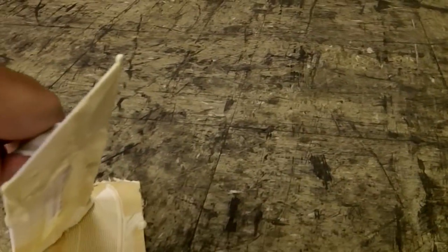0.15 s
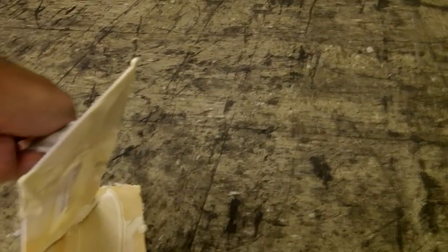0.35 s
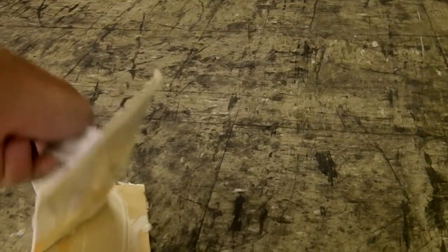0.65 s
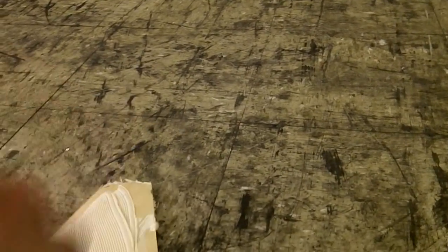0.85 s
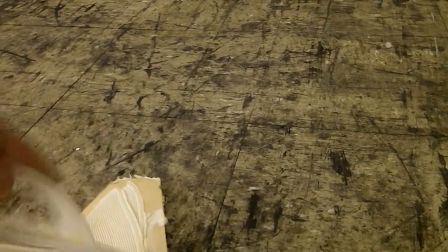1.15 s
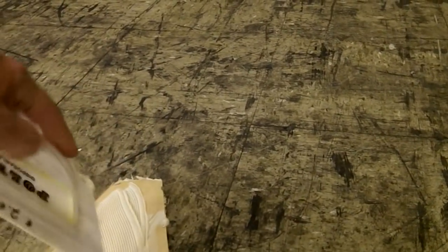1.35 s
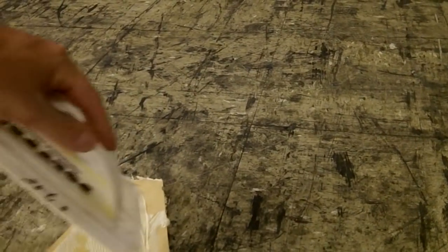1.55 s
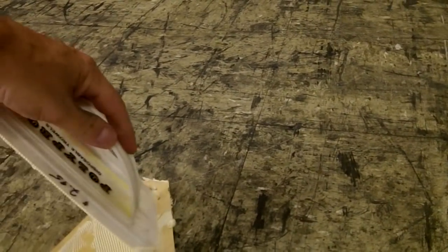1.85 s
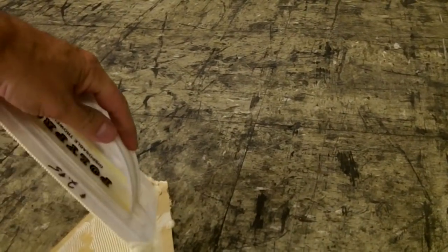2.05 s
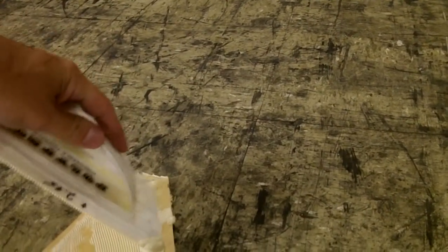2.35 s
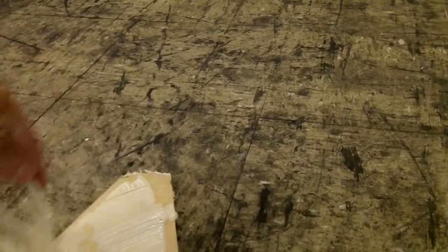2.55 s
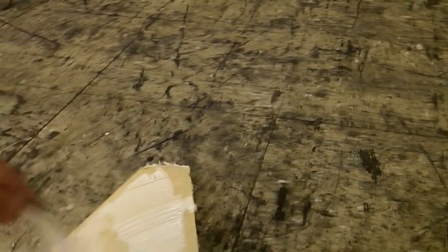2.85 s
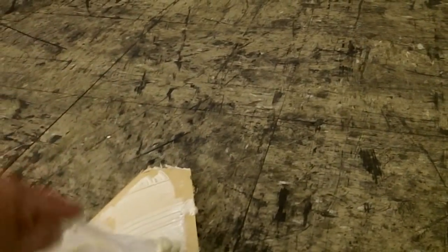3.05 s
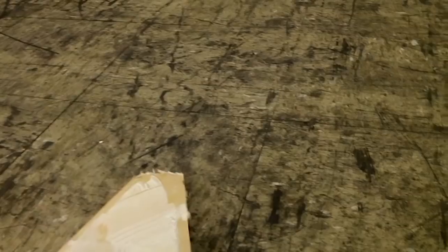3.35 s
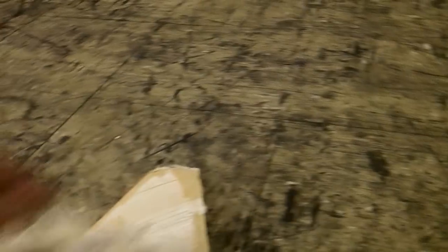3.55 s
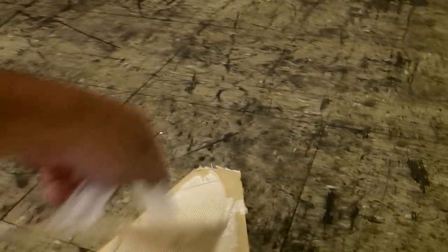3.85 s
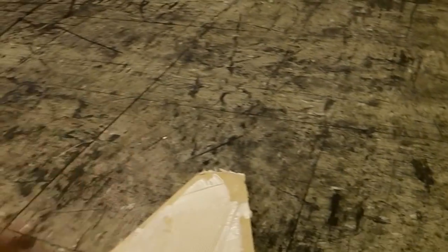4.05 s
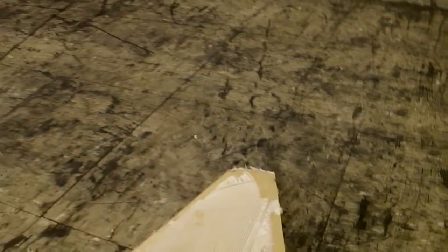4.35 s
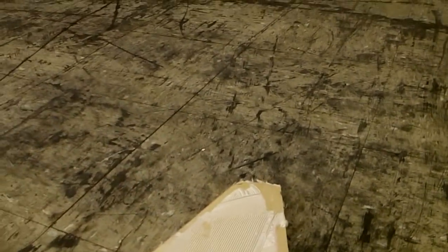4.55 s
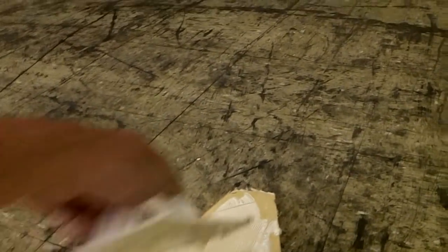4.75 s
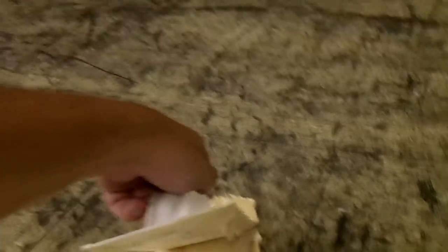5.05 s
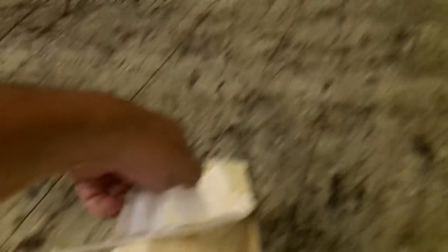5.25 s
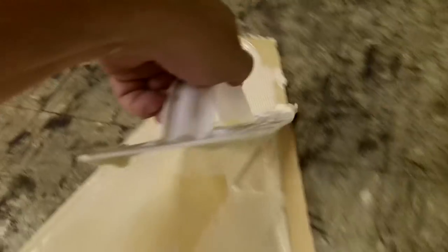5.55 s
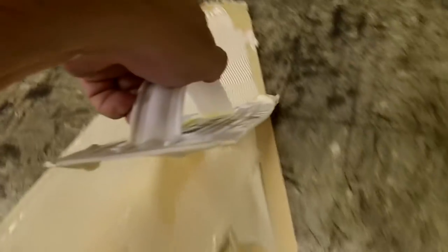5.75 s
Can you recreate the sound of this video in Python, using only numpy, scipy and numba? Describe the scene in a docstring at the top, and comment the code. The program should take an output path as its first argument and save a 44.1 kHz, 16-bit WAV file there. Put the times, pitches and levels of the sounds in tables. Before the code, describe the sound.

Close, gritty scraping strokes and hard plastic clacks on a wooden board, sticky ticks between them, with a distant low motor hum and soft hiss.

```python
"""On a workbench, close to a mono camera microphone, a notched plastic trowel combs adhesive over a thin wooden board.
Its teeth stick and slip: random impulses ring blade and board through moving resonances, with a tooth hiss on top.
It clacks down in noise bursts and decaying modes; the glue ticks and crackles as it lifts; the camera rumbles once.
Behind it a distant engine hums in wavering sine lines over a dull rumble, gaining speed on the whole.
Filtered noise makes the room and the microphone hiss, and a short faint tail comes back from bench and walls."""
import sys
import numpy as np
from scipy import signal
from scipy.fft import rfft, irfft
from scipy.io import wavfile
from numba import njit

SR = 44100
rng = np.random.default_rng(int(sys.argv[2]) if len(sys.argv) > 2 else 0)


def inscribe(sig):
    """Save sig as 16-bit PCM at rate SR to the path in sys.argv[1].

    A 1-D sig is mono; a 2-D sig holds one channel per row.
    Samples are clipped to [-1, 1] before scaling.
    """
    pcm = np.round(np.clip(np.atleast_2d(sig).T, -1, 1) * 32767)
    wavfile.write(sys.argv[1], SR, pcm.astype(np.int16))


N = 260631
TIME = np.arange(N) / SR

# decaying modes of the wooden board: f/Hz, t60/s, level/dB
BOARD_MODES = [(322, .07, -15), (532, .07, 0), (727, .08, -8), (178, .05, -19), (470, .03, -11),
               (815, .04, -14), (1020, .06, -18)]
# decaying modes of the plastic blade: f/Hz, t60/s, level/dB
BLADE_MODES = [(1388, 0.0241, 2), (1764, 0.0076, 3.5), (2054, 0.00654, 9), (2506, 0.0252, -3),
               (2874, 0.0163, 1), (3308, 0.0109, 1.5), (4028, 0.00494, 2.5), (5200, 0.0025, -5.5)]


def undb(db):
    """Decibels to gain."""
    return 10 ** (np.asarray(db) / 20)


def unit(x):
    """Scale to rms 1."""
    return x / np.sqrt(np.mean(x ** 2))


def colour(x, points):
    """Weight the spectrum of a sound by (f/Hz, level/dB) points, at rms 1."""
    hz, db = np.transpose(points)
    bins = np.maximum(np.fft.rfftfreq(N, 1 / SR), 1)
    gain = undb(np.interp(np.log(bins), np.log(hz), db))
    return unit(irfft(rfft(x) * gain, N))


def walk(rate):
    """Random wander with rate new targets per second, joined by straight lines; rms about 0.55."""
    knots = rng.standard_normal(4096)
    return 0.67 * np.interp(TIME * rate, np.arange(len(knots)), knots)


@njit
def resonate(x, hz, width_hz):
    """State-variable band-pass whose centre may move."""
    y = np.empty(len(x))
    band_state, low_state = 0., 0.
    for i in range(len(x)):
        g = np.tan(np.pi * hz[i] / SR)
        damping = width_hz / hz[i]
        # the tiny offset keeps the states from sinking into denormal numbers
        v = (band_state + g * (x[i] + 1e-18 - low_state)) / (1 + g * (g + damping))
        band_state = 2 * v - band_state
        low_state += 2 * g * v
        y[i] = damping * v
    return y


def band(x, hz, q):
    """Band-pass with a fixed centre."""
    return resonate(x, np.full(len(x), float(hz)), float(hz / q))


def ring(modes, scatter_db=0):
    """Impulse response of decaying modes; their shares scatter with the point of contact."""
    t = TIME[:SR // 4]
    response = np.zeros(len(t))
    for hz, t60, db in modes:
        level_db = db + scatter_db * rng.standard_normal()
        response += undb(level_db - 60 * t / t60) * np.sin(2 * np.pi * hz * t)
    return response


def through(x, response):
    """Pass a sound through an impulse response."""
    return signal.fftconvolve(x, response)[:N]


def add(out, s, sound, db):
    """Mix a short sound in at time s with its peak at db."""
    i = int(s * SR)
    out[i:i + len(sound)] += (undb(db) * sound / np.abs(sound).max())[:N - i]


def burst(t60):
    """A crack of noise that decays by 60 dB in t60 seconds."""
    t = TIME[:SR // 4]
    return rng.standard_normal(len(t)) * undb(-60 * t / t60)


def thin(x, edge_hz=900):
    """The small blade radiates little bass."""
    return signal.sosfilt(signal.butter(2, edge_hz, "highpass", fs=SR, output="sos"), x)


def slips(per_s, spread_db, judder_db, judder_rate):
    """Tiny releases as random impulses, uneven in size, with a level that judders."""
    hit = rng.random(N) < per_s / SR
    size = undb(spread_db * np.minimum(rng.exponential(size=N), 5))
    sign = rng.choice([-1, 1], N)
    return unit(hit * size * sign * undb(judder_db * walk(judder_rate)))


def stroke_controls():
    """Pushes build, sag and die away; overlapping powers add and weight the place of the resonances."""
    # pushes of the hand, overlapping in a long stroke, each with its own grip and place on the board:
    # full pressure t/s, attack/s per 20 dB, hold/s, release/s per 20 dB (negative: held to the end),
    # blade level/dB, board level/dB and tooth hiss level/dB relative to the blade,
    # board f/Hz, blade first f/Hz, blade second f/Hz, upper blade resonances level/dB
    pushes = [ (0.01, .03, 0.019, 0.1148, -55, 4, -14, 522, 1370, 1890, -7),
              (.335, .008, .025, .13, -43.5, 3.5, -15.5, 520, 1370, 1890, -13),
              (.49, .07, .072, .05, -49, 6.5, -6, 534, 1370, 1890, -7),
              (.59, .08, 0.0227, .04, -51, -10, 2, 540, 1370, 1890, -1.5),
              (.748, .025, 0.089, 0.1858, -47, 10, 2, 560, 1380, 1900, -2),
              (.87, .07, 0.0423, .08, -19.7, -23, -15.5, 680, 1600, 1880, -7),
              (.955, .08, .04, .07, -23, -22, -6, 697, 1380, 2200, 3),
              (.995, 0.0473, .05, .055, -24, -12.5, -13.5, 531, 1255, 2193, -1.5),
              (1.09, .1, .02, .15, -47.5, -3, -14, 540, 1260, 2150, -2),
              (1.52, 0.0537, .3, .1, -64, 3, -14, 540, 1400, 1900, -6),
              (1.945, .06, .05, .25, -42.5, -4, -4.5, 585, 1800, 2200, -8),
              (2.12, .08, .02, .12, -53, 5, -9, 590, 1840, 2260, -6),
              (2.245, 0.0337, .018, .022, -39.5, 1, -3, 510, 1540, 2450, -7),
              (2.51, .07, .03, .08, -44, 3, 3, 580, 1380, 1943, -2),
              (2.585, .07, .06, .09, -20.3, -12, -10.5, 680, 1370, 1920, -2),
              (2.75, .15, .115, .05, -24, -7.5, -15, 540, 1330, 1450, -12.5),
              (3.215, .035, .06, 0.02, -49, 2, -6.5, 537, 1400, 2704, 0),
              (3.345, .12, 0.0436, 0.0946, -29.3, -10, -12, 640, 1400, 2710, -5),
              (3.44, .09, 0.0498, .08, -27, -11, -4.5, 769, 1516, 2050, 1),
              (3.92, .04, .03, .1, -48, 7, -14, 530, 1530, 1800, -5),
              (3.99, .065, .06, .12, -24, -13.5, -10.5, 540, 1530, 1800, -4),
              (4.08, .08, .1, .12, -24, -11.5, -9.5, 580, 1500, 2050, 1),
              (4.23, .09, 0.2051, .08, -27, -4.5, -6.5, 780, 1653, 2400, 0.5),
              (4.47, .07, .028, .035, -23.7, -8, -4.5, 800, 1627, 2640, 4),
              (5.235, .045, 0.0603, .08, -27.3, -8, -14.5, 590, 1520, 1940, -15),
              (5.39, .04, .18, 0.45, -39, -8, -14.5, 600, 1420, 1872, -5),
              (5.66, .09, .05, .09, -24.5, -12.5, -14, 710, 1737, 1893, -6.5),
              (5.83, .2, .08, -2.4, -31.5, -8, -13.5, 738, 1580, 1906, 1)]
    sag_db_per_s = 8  # the hand eases off through the hold
    # dB per dB of pressure: a light touch leaves mostly board, the teeth bite only when pressed
    board_slope, tooth_slope = .8, 1.15
    # the blade flexes under the hand: scale of the resonance shift (share) and upper level, targets per s
    flex_share, flex_db, flex_rate = .03, 1.5, 14
    t = TIME[::32]
    blade = board = teeth = tuning = 0
    for at, attack, hold, release, db, board_db, tooth_db, *resonances in pushes:
        away = np.maximum((at - t) / attack, (t - at - hold) / release)
        sag_db = sag_db_per_s * (np.clip(t - at, 0, hold) - hold / 2)
        press_db = -20 * np.clip(away, 0, 6) - sag_db
        power = undb(db + press_db) ** 2
        blade = blade + power
        tuning = tuning + np.outer(resonances, power)
        board = board + undb(db + board_db + board_slope * press_db) ** 2
        teeth = teeth + undb(db + tooth_db + tooth_slope * press_db) ** 2
    level_db = 10 * np.log10(blade)
    board_rel_db = 10 * np.log10(board / blade)
    teeth_rel_db = 10 * np.log10(teeth / blade)
    controls = level_db, board_rel_db, teeth_rel_db, *(tuning / blade)
    *steady, first_hz, second_hz, upper_db = (np.interp(TIME, t, c) for c in controls)
    flex = walk(flex_rate)
    bend = 1 + flex_share * flex
    return *steady, first_hz * bend, second_hz * bend, upper_db + flex_db * flex


def scraping():
    """One stream of slips drives blade, board and tooth hiss; resonances shift as the blade bends and travels."""
    # broad colour of the rubbing in board, blade and teeth: f/Hz, level/dB
    board_rub = [(100, -30.5), (220, -35), (340, -13), (500, -5.5), (750, -3.5), (1050, -0.5), (1400, -23),
                 (2500, -67)]
    blade_rub = [(600, -49.5), (1100, -4), (1350, 3.5), (1750, 3), (2300, 4.5), (3100, 1.5), (3700, -5.5),
                 (4500, -30.5), (7000, -101)]
    tooth_rub = [(1800, -78.5), (3200, -3), (3900, 1.5), (5000, -4), (6200, -10), (7100, -17.5),
                 (7800, -54.5), (9200, -24.5), (14000, -78.5)]
    level_db, board_db, tooth_db, board_hz, first_hz, second_hz, upper_db = stroke_controls()
    # the third blade resonance, 2844 Hz when the second is at 2007 Hz, bends less than the second
    third_hz = 2844 * (second_hz / 2007) ** 0.352
    drive = slips(per_s=4400, spread_db=2.5, judder_db=1.86, judder_rate=130)

    rub = colour(drive, blade_rub)
    upper = undb(upper_db)
    first = unit(resonate(rub, first_hz, 296.0))
    second = np.sqrt(upper) * unit(resonate(rub, second_hz, 430.0))
    third = upper * unit(resonate(rub, third_hz, 480.0))
    blade_ring = unit(through(rub, ring(BLADE_MODES)))
    blade = unit(unit(first + second + third) + undb(-5) * rub + undb(-14) * blade_ring)

    rub = colour(drive, board_rub)
    moving = unit(resonate(rub, board_hz, 139.0))
    board_ring = unit(through(rub, ring(BOARD_MODES)))
    board = unit(rub + undb(1.5) * moving + undb(-2.5) * board_ring)

    teeth = colour(drive + undb(-1.5) * rng.standard_normal(N), tooth_rub)
    return undb(level_db) * (blade + undb(board_db) * board + undb(tooth_db) * teeth)


def knocks(build_s=0.00163, clack_q=1.185, thump_q=0.517):
    """Each contact clacks the blade at once; the heavier board takes a few milliseconds to swing."""
    # the blade landing, bouncing and catching on the board:
    # t/s, clack peak level/dB, clack centre f/Hz, board thump peak level/dB
    contact_table = [(0.2796, -31, 1200, -32), (0.286, -37, 1100, -38), (0.3303, -29, 1600, -35),
                     (0.352, -40, 650, -27), (0.377, -45, 800, -33), (0.871, -12, 2000, -40),
                     (0.8835, -9, 2021, -54.5), (0.897, -12, 1800, -45), (1.0174, -13, 2400, -51.5),
                     (1.911, -45.5, 2200, -29), (2.241, -26, 2500, -26.5), (2.26, -29.5, 2500, -23),
                     (2.664, -14, 2400, -20), (3.361, -16, 2400, -37), (3.5285, -4, 2200, -42),
                     (3.531, -10, 1400, -34), (3.8457, -2, 2370, -16), (3.8585, -5, 1900, -12),
                     (3.8642, -20, 2200, -14), (5.1249, -4, 3000, -15), (5.134, -22, 1400, -28),
                     (5.1418, -18, 1400, -14), (5.1484, -19.5, 2000, -22), (5.2395, -11.5, 1900, -32),
                     (5.544, -24, 1800, -41), (5.6539, -8, 1774, -33.5)]
    thump_ratio = .28  # thump centre over clack centre: a softer contact lowers both alike
    out = np.zeros(N)
    swing = 1 - np.exp(-TIME[:SR // 4] / build_s)
    for s, clack_db, clack_hz, thump_db in contact_table:
        blade = ring(BLADE_MODES, scatter_db=2)
        board = ring(BOARD_MODES, scatter_db=1)
        clack = blade + undb(1.5) * burst(t60=0.0122) + undb(-16.5) * burst(t60=0.051)
        add(out, s, band(thin(clack), clack_hz, clack_q), clack_db)
        add(out, s, band(swing * board, thump_ratio * clack_hz, thump_q), thump_db)
    return out


def ticks(tick_q=1.44):
    """Sticky glue lets go in small cracks that ring the lifted blade."""
    # glue strings snapping and teeth ticking: t/s, peak level/dB, centre f/Hz, t60 of the crack/s
    snap_table = [(0.236, -31, 1760, 0.0176), (1.175, -26, 3430, 0.0077), (1.186, -29, 3020, 0.0166),
                  (1.198, -31, 2300, .015), (1.232, -29, 2800, 0.12), (1.247, -24, 2500, 0.081),
                  (1.298, -26.5, 1930, 0.0328), (1.319, -26.5, 2700, 0.15), (1.401, -28.5, 3050, 0.0088),
                  (1.409, -26, 3000, 0.0146), (1.7605, -26.5, 3670, 0.0031), (3.195, -28, 2600, .006),
                  (3.2025, -16, 3600, 0.0114)]
    out = np.zeros(N)
    for s, db, hz, t60 in snap_table:
        crack = burst(t60)
        ringing = through(crack, ring(BLADE_MODES, scatter_db=6.5))[:len(crack)]
        tick = unit(crack) + undb(-10) * unit(ringing)
        add(out, s, band(thin(tick), hz, tick_q), db)
    return out


def peeling(at_s=1.28, length_s=0.14, db=-54, centre_hz=2900, q=1.2):
    """Fine threads of glue crackle at random while the blade comes away."""
    crackle = slips(per_s=160, spread_db=4.0, judder_db=0.5, judder_rate=30)
    swell = np.exp(-((TIME - at_s) / length_s) ** 2)
    return undb(db) * swell * unit(band(thin(crackle), centre_hz, q))


def workshop(x, t60=0.205, wet_db=-17, first_s=0.0081):
    """A short, faint tail from bench and walls, as decaying noise after a brief gap."""
    t = TIME[:SR // 2]
    tail = rng.standard_normal(len(t)) * undb(-60 * t / t60) * (t > first_s)
    return x + undb(wet_db) * through(x, tail / np.linalg.norm(tail))


def handling(at_s=4.6, length_s=0.08, db=-46):
    """The camera is swung after the stroke and rumbles briefly."""
    low_noise = [(15, -9.5), (30, 4.5), (60, -17.5), (150, -11.5), (600, -69)]  # f/Hz, level/dB
    rumble = colour(rng.standard_normal(N), low_noise)
    return undb(db) * np.exp(-((TIME - at_s) / length_s) ** 2) * rumble


def engine():
    """Only the lowest lines of the engine and a dull rumble come through the walls, the rumble following its speed."""
    # level of the hum: t/s, level/dB
    hum_level = [(0, -67), (.6, -58), (.8, -53), (1.05, -53.5), (1.88, -46), (2.05, -50), (2.42, -47.5),
                 (2.58, -57), (2.8, -54), (3.08, -55), (3.33, -43), (3.8, -44), (4.35, -40.5), (4.75, -44),
                 (5.05, -40.5), (5.38, -37.5), (5.91, -44)]
    # engine speed: t/s, firing rate f/Hz
    firing_rate = [(0.0, 57.0), (0.21, 56.5), (0.43, 53.37), (0.62, 53.5), (0.79, 58.0), (1.1, 62.78),
                   (1.79, 60.55), (2.67, 69.4), (3.31, 74.1), (4.03, 78.4), (5.81, 84.47), (5.91, 86.63)]
    # engine lines: multiples of the firing rate [ratio], and their level/dB relative to the hum level
    line_orders = [1, 4 / 3, 7 / 5, 2, 3, 10 / 3]
    line_levels = [0.5, -15, -12, -20, -18.5, -20]
    # colour of the dull rumble: f/Hz, level/dB
    rumble_colour = [(90, -14), (150, -1), (270, 0), (400, -7), (900, -30)]
    rumble_db, rumble_db_per_hz = -53, .6  # level at top speed, loss per Hz of firing rate below it
    hz = np.interp(TIME, *np.transpose(firing_rate))
    db = np.interp(TIME, *np.transpose(hum_level))
    phase = 2 * np.pi * np.cumsum(hz) / SR
    hum = np.zeros(N)
    for order, line_db in zip(line_orders, line_levels):
        gain = undb(line_db + 3 * walk(6))
        hum += gain * np.sin(order * (phase + .18 * walk(9)))
    rumble_gain = undb(rumble_db + rumble_db_per_hz * (hz - hz.max()))
    rumble = rumble_gain * colour(rng.standard_normal(N), rumble_colour)
    return undb(db) * hum + rumble


def background():
    """Softly wavering room noise and the even hiss of the microphone, both as coloured noise."""
    # colour of the room noise and of the microphone hiss: f/Hz, level/dB
    room_colour = [(20, 1), (45, 3), (70, 0), (110, -4.5), (170, -7.5), (300, -10), (500, -9), (700, -10),
                   (1200, -12), (3000, -15.5), (5000, -19.5), (6800, -23.5), (7700, -37.5)]
    hiss_colour = [(7900, -49), (8400, -3.5), (9200, -0.5), (11000, 2), (14000, 0), (15300, -4)]
    room_db, hiss_db = -50.2, -59.5
    room = colour(rng.standard_normal(N), room_colour) * undb(room_db + 0.22 * walk(3.64))
    return room + undb(hiss_db) * colour(rng.standard_normal(N), hiss_colour)


def scene(click_treble_db=-24):
    """Trowel, engine and room at one microphone; the plastic's clicks carry little above about 7 kHz."""
    clicks = knocks() + ticks() + peeling()
    contacts = signal.sosfilt(signal.butter(10, 6800, fs=SR, output="sos"), clicks)
    treble = signal.sosfilt(signal.butter(10, 8600, "highpass", fs=SR, output="sos"), clicks)
    trowel = workshop(scraping() + contacts + undb(click_treble_db) * treble)
    mono = trowel + engine() + background() + handling()
    return np.array([mono, mono])


def record(dry):
    """The camera cuts the top above 15.4 kHz."""
    return signal.sosfilt(signal.ellip(8, .2, 70, 15400, fs=SR, output="sos"), dry)


dry = scene()
out = record(dry)
inscribe(out)
```